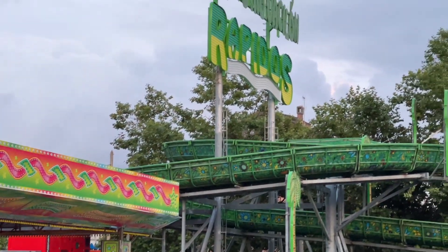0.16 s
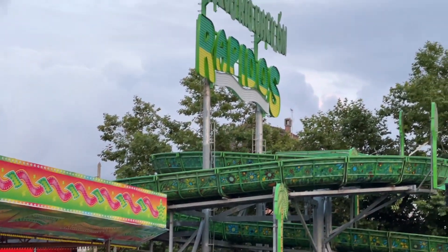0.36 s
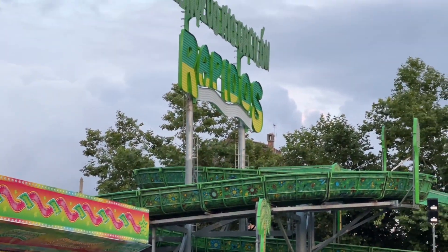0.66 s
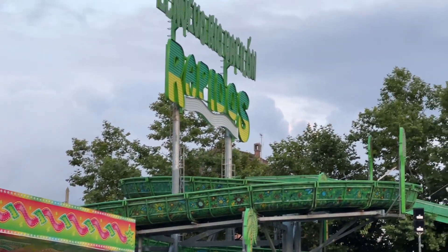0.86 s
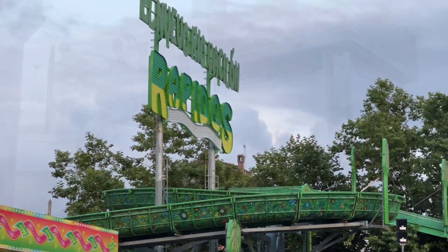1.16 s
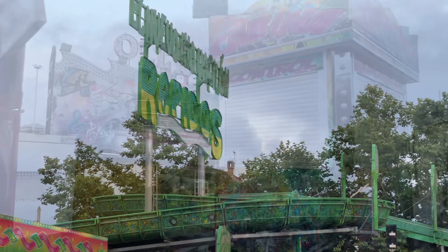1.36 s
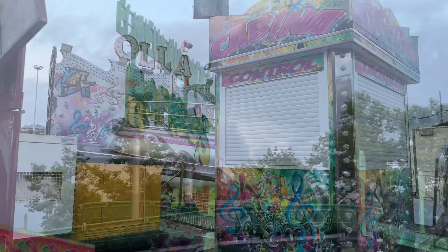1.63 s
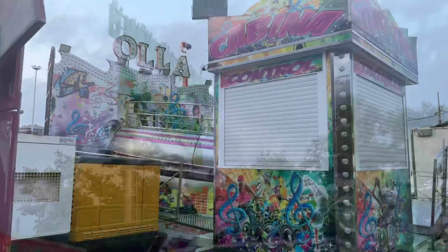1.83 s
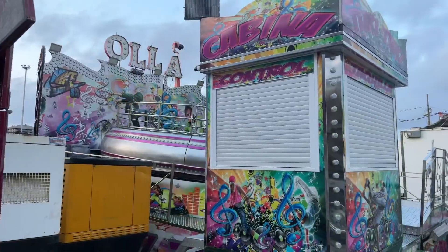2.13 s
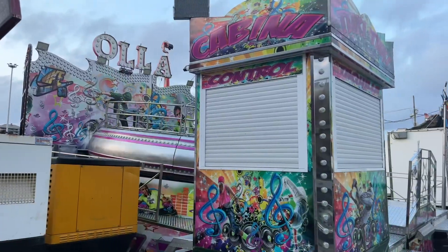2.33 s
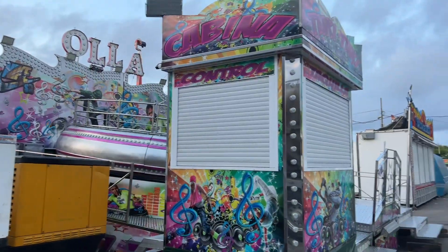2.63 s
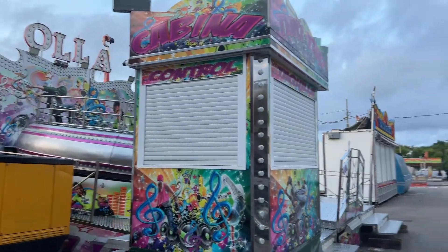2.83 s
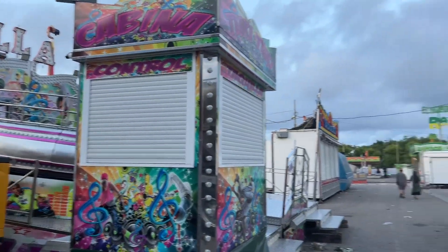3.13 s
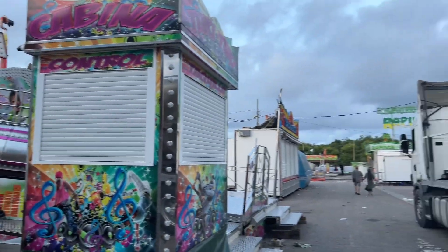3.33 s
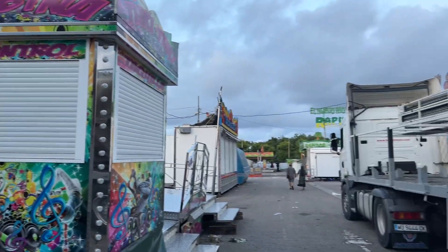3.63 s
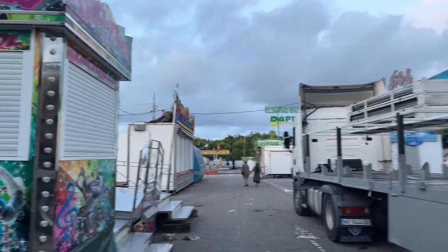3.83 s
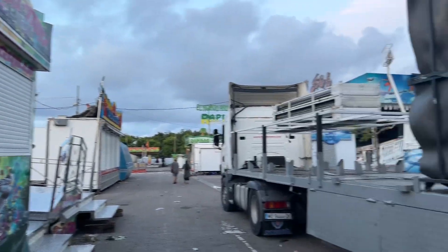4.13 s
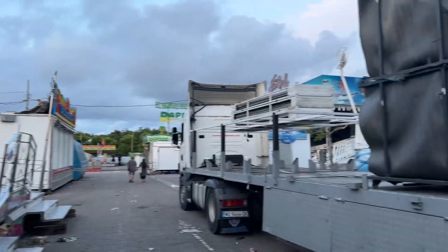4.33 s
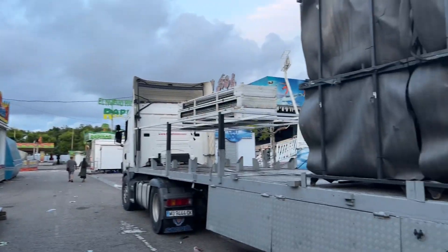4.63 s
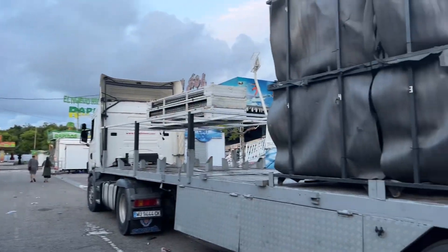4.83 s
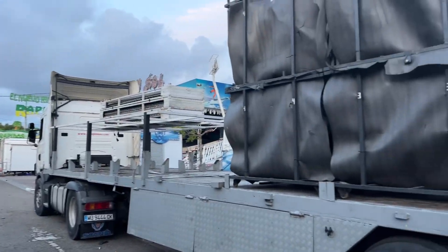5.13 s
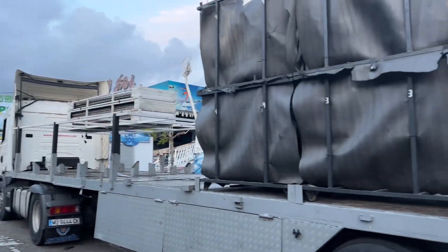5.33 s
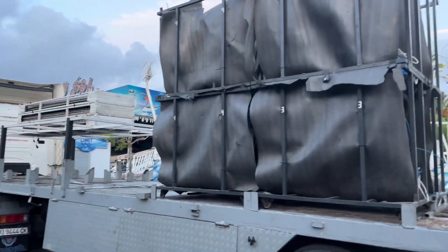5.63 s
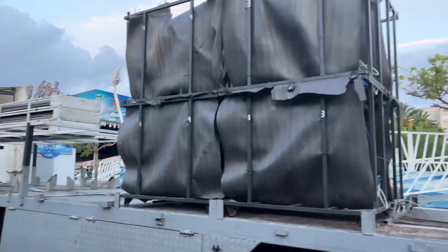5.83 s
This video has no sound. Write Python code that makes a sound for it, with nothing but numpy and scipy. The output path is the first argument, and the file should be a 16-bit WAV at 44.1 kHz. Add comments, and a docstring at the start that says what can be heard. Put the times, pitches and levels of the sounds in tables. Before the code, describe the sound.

For the first second, engines drone faintly across an empty fairground over a dull wash of outdoor noise. One soft swish of air swells at about 0.3 seconds and dies away. Between 1.1 and 2.2 seconds, this background gives way to a much louder diesel generator a few steps from the microphone. It holds a steady speed, with a fast, low exhaust throb, a roaring cooling fan, hissing air and a knocking casing that now and then clatters harder. A thin, shrill whistle wavers on top, and fainter high whistles come and go. From about 2.9 to 4.6 seconds the machine shifts from right to left as the listener turns, the fan loudest near 4.5 seconds. A bright rattle gradually grows, panels hum briefly, and the whistle swells after 5 seconds. Stalls and trailers reflect the sound, which continues to the end at about 6 seconds.

```python
"""A far drone and one soft swish carry across an empty fairground; then a diesel generator fades in close.
At the microphone its firings thump through the silencer, the casing knocks and the cooling fan roars,
with a thin unsteady whistle on top. Hard stalls and trailers throw the sound back from all around.
The listener turns, so the machine swings from right to left."""
import sys
import numpy as np
from scipy import signal
from scipy.fft import rfft, irfft
from scipy.io import wavfile
from scipy.ndimage import map_coordinates

SR = 44100
rng = np.random.default_rng(int(sys.argv[2]) if len(sys.argv) > 2 else 0)


def inscribe(sig):
    """Save sig as 16-bit PCM at rate SR to the path in sys.argv[1].

    A 1-D sig is mono; a 2-D sig holds one channel per row.
    Samples are clipped to [-1, 1] before scaling.
    """
    pcm = np.round(np.clip(np.atleast_2d(sig).T, -1, 1) * 32767)
    wavfile.write(sys.argv[1], SR, pcm.astype(np.int16))


N = 263718
T = np.arange(N) / SR
HZ = np.maximum(np.arange(N // 2 + 1) * SR / N, 1)

# exhaust at the silencer, close up: (frequency [Hz], relative level [dB])
SILENCER_SPECTRUM = [(20, -40), (39, -33), (52, -9), (78, 0), (117, 2.5), (156, 0.2), (195, -7.5),
                     (240, -19), (350, -25), (600, -28.5), (2000, -64), (8000, -130)]
# the three firings of an engine cycle: (relative level [dB])
FIRING_LEVELS = [2, 1, 0.5]
# moments when the thump sags or lifts slightly: (time [s], half-width [s], gain [dB])
THUMP_DIPS = [(1.835, .06, -3), (2.052, 0.024, -12), (3.2, 0.042, -3), (3.626, 0.055, -5.5),
              (3.9, 0.034, 0.5), (4.33, 0.032, -2), (5.42, .03, -8)]
# low tones out of step with the firings, making the chug uneven: (frequency [Hz], level [dB])
CHUG_TONES = [(33.5, -53), (67.8, -48.5), (112.6, -44.5)]
# modes of the casing: (frequency [Hz], relative level [dB])
CASING_MODES = [(735, -4.5), (785, 0.5), (850, 2), (940, -1.5), (1000, -2.5), (1125, -3.5), (1230, -7)]
# the casing clatters harder: (time [s], half-width [s], gain [dB])
CASING_CLATTERS = [(1.45, .02, 6), (1.69, .03, 3), (2.23, .04, 7), (2.86, .03, 3), (3.54, .05, 4),
                   (3.78, .04, 5), (4.33, .05, 5), (4.8, .035, 7), (5.32, .04, 3)]
# low rumble around the machine: (frequency [Hz], relative level [dB])
RUMBLE_SPECTRUM = [(20, -36), (32, -8), (40, -8), (52, 0), (66, 0.5), (100, -6.5), (135, -0.5), (170, 0),
                   (205, -8.5), (280, -33), (500, -56)]
# roar of the cooling fan: (frequency [Hz], relative level [dB])
FAN_SPECTRUM = [(120, -11), (220, -4), (290, 0.5), (355, 1), (425, -1.5), (470, -1.5), (660, -4.5),
                (830, -5), (1150, -3), (1400, -7), (1800, -6.5), (2050, -14.5), (4000, -38.5)]
# bright rattle of the casing: (frequency [Hz], relative level [dB])
RATTLE_SPECTRUM = [(900, 4), (1500, -3), (1800, 0), (2100, 4), (2500, 7), (2720, 0), (2850, 0),
                   (3500, -1.5), (4300, -5.5), (5500, -43)]
# hiss of the air outlet: (frequency [Hz], relative level [dB])
OUTLET_SPECTRUM = [(3500, -1.5), (5000, 5.5), (6000, 6), (6800, 6), (7400, 4.5), (9000, 0), (12000, -3.5),
                   (15500, -10.5)]
# narrow tones of fan, belt and casing: (frequency [Hz], half-width [Hz], level [dB])
MACHINE_TONES = [(233.7, 1.9, -52.5), (332.7, 1.7, -50.5), (367, 18, -48.5), (421, 19, -46.5),
                 (777, 18, -49.5), (850, 15, -50), (1129, 17, -50.5), (1620, 20, -59), (2380, 30, -64),
                 (2690, 17, -55.5)]
# short thin whistles: (time [s], half-width [s], frequency [Hz], waver [Hz], level [dB])
SHORT_WHISTLES = [(1.8, .28, 6880, 12, -49), (2.0, .5, 2680, 12, -54), (1.97, .07, 4587, 8, -47),
                  (2.3, .15, 4587, 8, -50), (2.68, .13, 4587, 8, -48), (2.65, .15, 6800, 20, -54),
                  (4.05, .15, 4610, 10, -51), (4.35, .04, 6860, 30, -51), (4.8, .25, 6885, 22, -49.5),
                  (5.6, .14, 7392, 12, -55), (4.8, .07, 2370, 20, -48), (5.25, .06, 2450, 20, -48),
                  (5.7, .6, 2685, 18, -49.5), (5.75, .12, 4570, 30, -47)]
# panels humming up: (time [s], half-width [s], frequency [Hz], level [dB])
PANEL_NOTES = [(3.71, .06, 366, -40), (4.39, .06, 358, -39), (5.12, .05, 300, -40), (5.2, .04, 585, -38),
               (5.31, .04, 598, -41), (5.38, .04, 362, -36), (5.6, .04, 376, -39), (5.92, .08, 502, -38)]
# the main whistle swells and sinks, more so on the left: (time [s], half-width [s], gain [dB])
WHISTLE_GAINS = [(1.7, 0.22, 1.5), (2.12, .04, 2.5), (2.618, 0.044, 5), (2.97, .1, -0.5), (4.12, 0.043, 1),
                 (4.357, .07, 2), (4.7, 0.36, -2.5), (5.362, 0.23, 3.5), (5.807, 0.11, 3), (5.97, .025, 2)]
# the main whistle bends upward: (time [s], half-width [s], rise [Hz])
WHISTLE_RISES = [(1.87, .04, 85), (2.11, .045, 85), (2.61, .035, 60), (2.86, .05, 75), (3.09, .04, 65),
                 (3.62, .25, 45), (4.26, .04, 45), (4.54, .09, 55), (4.77, .05, 40), (5.0, .045, 115),
                 (5.24, .04, 45), (5.58, .11, 30), (5.98, .045, 155)]
# dull wash from across the grounds: (frequency [Hz], relative level [dB])
WASH_SPECTRUM = [(25, -26), (38, -6), (52, -6), (65, -2), (90, -10.5), (125, -6), (180, -10), (310, -12.5),
                 (540, -18), (640, -25), (1140, -23.5), (1560, -29.5), (2100, -29), (8100, -46),
                 (12000, -70)]
# exhaust at a distance: (frequency [Hz], relative level [dB])
DRONE_SPECTRUM = [(20, -34), (39, -14), (78, 1), (117, -32), (156, 2), (195, -4.5), (240, -15.5),
                  (600, -29.5), (2000, -67), (8000, -130)]
# other machines droning far off: (frequency [Hz], half-width [Hz], level [dB])
DISTANT_TONES = [(56.2, 2.9, -46), (92.4, 14, -46.5), (299, 15, -58), (557, 8.6, -64.5)]
# the far hum swells: (time [s], half-width [s], frequency [Hz], level [dB])
DISTANT_SWELLS = [(.1, .1, 99, -41), (.13, .14, 121, -46), (.16, .18, 548, -59), (.42, .06, 88, -42),
                  (1.08, .06, 84, -43)]
# soft rush of air: (frequency [Hz], relative level [dB])
SWISH_SPECTRUM = [(300, -11), (700, -0.5), (1200, 1), (1600, -4), (2200, -1), (3200, -6), (4500, -11),
                  (7000, -14.5), (9000, -20), (11000, -77)]
# early echoes off ground and stalls: (delay [ms], level [dB])
EARLY_ECHOES = [(7.3, -32.5), (11.2, -27), (17.5, -13)]
# likeness of left and right in the sound off the stalls: (frequency [Hz], correlation [-1 to 1])
STALL_CORRELATION = [(60, 0.89), (170, 0.82), (400, 0.92), (660, -0.61), (850, 0.85), (1150, -0.17),
                     (1600, -0.67), (2300, -0.046), (4000, 0.0088), (15000, -0.18)]
# shading of the two ears: (frequency [Hz], left minus right [dB])
EAR_SHADING = [(130, -2.5), (300, -4.5), (520, 1), (720, -2), (1030, 2.5), (1600, 0.5), (2450, -2.5),
               (4000, 0.5), (6300, 6.5), (8300, -2), (11000, 0)]

FIRING_HZ, FIRST_FIRING_S = 39.03, .0028
TURN_S, TURN_LENGTH_S = 2.88, 1.68  # the listener turns at an even pace
FIRST_LAG_MS, LAST_LAG_MS = 0.25, -0.458  # left ear behind right


def generator(firings):
    """The machine from a few steps away; `firings` is the running count of its firings."""
    thump = aimed(exhaust(firings, SILENCER_SPECTRUM, scatter_db=1.0))
    thump *= undb(-29.5 + swells(THUMP_DIPS))
    casing = casing_shake(firings) + casing_knocks(firings)
    rumble = diffuse(undb(curve(RUMBLE_SPECTRUM)), curve(STALL_CORRELATION)) * undb(-36)
    rush = fan_roar(firings) + casing_rattle(firings) + outlet_hiss()
    machine = thump + casing + rumble + rush + steady_tones() + brief_tones()
    return irfft(rfft(machine) * pan(curve(EAR_SHADING)), N) + whistle(firings)


def exhaust(firings, spectrum, scatter_db, chamber_hz=135, chamber_width_hz=50):
    """One pulse a firing, each cylinder a little different, rings the silencer."""
    onsets = firing_samples(firings)
    scatter = scatter_db * rng.standard_normal(len(onsets))
    pulses = np.zeros(N)
    pulses[onsets] = undb(np.resize(FIRING_LEVELS, len(onsets)) + scatter)
    # the chamber lets its own note out late
    chamber = np.exp(-2j * np.arctan((HZ - chamber_hz) / chamber_width_hz))
    return unit(irfft(rfft(ring(pulses, spectrum)) * chamber, N))


def casing_shake(firings):
    """The casing shakes twice a crank turn: a low hum, with other tones beating against it."""
    crank_turns = firings * 2 / len(FIRING_LEVELS)
    hum = unit(np.sin(4 * np.pi * crank_turns) * undb(2 * wander(1.3))) * undb(-47)
    return aimed(hum + sum(undb(db) * tone(hz, waver_hz=3.64) for hz, db in CHUG_TONES))


def casing_knocks(firings, attack_s=.002, t60_s=.085, slack_s=.018, scatter_db=3.5):
    """Every firing knocks the loose panels, each a little late and with its own strength."""
    onsets = firing_samples(firings)
    age = T[:SR // 4]
    envelope = (1 - np.exp(-(age / attack_s) ** 2)) * undb(-60 * age / t60_s)
    knocks = 0
    for hz, db in CASING_MODES:
        slack = (slack_s * SR * rng.random(len(onsets))).astype(int)
        strength = undb(db + scatter_db * rng.standard_normal((len(onsets), 1)))
        blows = np.zeros((2, N))
        blows[:, np.minimum(onsets + slack, N - 1)] = (strength * rng.standard_normal((len(onsets), 2))).T
        mode = envelope * np.sin(2 * np.pi * hz * age)
        knocks += signal.fftconvolve(blows, [mode], axes=1)[:, :N]
    return unit(knocks) * undb(-41.5 + swells(CASING_CLATTERS))


def fan_roar(firings, blade_hz=146):
    """The fan blades chop the air; the roar is loudest as the listener's turn ends."""
    blades = np.cos(2 * np.pi * np.cumsum(blade_hz + 2 * wander(5.6)) / SR)
    roar = among_stalls(undb(curve(FAN_SPECTRUM)), direct_db=-7.5)
    flutter_db = 0.5 * np.cos(4 * np.pi * firings) + 0.53 * blades + 1.57 * wander(22)
    return roar * undb(-34 + 2.5 * swell(4.53, 0.3) + flutter_db)


def casing_rattle(firings):
    """A bright rattle pulses with the firings and grows as the casing comes into the open."""
    rattle = among_stalls(undb(curve(RATTLE_SPECTRUM)), direct_db=-22)
    flutter_db = 0.23 * np.cos(2 * np.pi * firings) + 1.35 * wander(19)
    return rattle * undb(-44 + opening(db_per_s=2.5) + flutter_db)


def outlet_hiss():
    """Air hisses from the outlet as it comes into the open, sinking a little in mid-turn."""
    hiss = among_stalls(undb(curve(OUTLET_SPECTRUM)), direct_db=-8.5)
    return hiss * undb(-40.5 + opening(db_per_s=0.56) - swell(3.9, 1) + 0.78 * wander(26))


def steady_tones():
    """Fan, belt and casing sing in narrow bands of noise."""
    power = sum((undb(db) * unit(resonance(hz, width))) ** 2 for hz, width, db in MACHINE_TONES)
    return np.sqrt(np.mean(power)) * among_stalls(np.sqrt(power), direct_db=0.62)


def brief_tones():
    """Thin whistles and panel hums come and go, straight from the machine."""
    whistles = sum(undb(db) * swell(s, width) * tone(hz, waver)
                   for s, width, hz, waver, db in SHORT_WHISTLES)
    return aimed(whistles + hums(PANEL_NOTES, waver_hz=4.25))


def whistle(firings, pitch_hz=4724, steady_hz=4702, drift_hz=14, flutter_hz=27, ripple_hz=46):
    """A shrill wandering whistle beats with its echoes, beside a steadier one and a scattered skirt."""
    hz = pitch_hz + swells(WHISTLE_RISES) + drift_hz * wander(12) + flutter_hz * wander(96.8)
    hz += ripple_hz * np.cos(2 * np.pi * firings)
    core = unit(np.sin(2 * np.pi * np.cumsum(hz) / SR) * undb(2.2 * wander(76)))
    # one echo reaches each ear
    echoes = np.array([np.roll(core, int(ms * SR / 1000)) for ms, _ in EARLY_ECHOES[:2]])
    skirt = among_stalls(resonance(pitch_hz, 213) ** 2, direct_db=-18)
    steady = np.array([tone(steady_hz, waver_hz=8.63) for ear in range(2)])
    voices = unit(aimed(core) + undb(-4) * echoes + undb(-1.5) * skirt + undb(-5) * steady)
    swell_db = swells(WHISTLE_GAINS)
    return voices * undb(-39 + swell_db) * pan(2 + swell_db)


def fairground(firings):
    """Engines drone far across the grounds over a dull wash, and one swish passes."""
    wash = diffuse(undb(curve(WASH_SPECTRUM)), 0.73) * undb(-44 + 0.39 * wander(9.2))
    drone = exhaust(firings, DRONE_SPECTRUM, scatter_db=3.5) * undb(-46)
    machines = sum(undb(db) * noise(resonance(hz, width)) for hz, width, db in DISTANT_TONES)
    return (wash + drone + machines + hums(DISTANT_SWELLS, waver_hz=2.9) + swish()) * pan(-0.8)


def swish(peak_s=0.29, rise_db_per_s=33, fall_db_per_s=49):
    """A soft rush of air starts abruptly, swells and dies away."""
    db = -45.5 + np.minimum(rise_db_per_s * (T - peak_s), fall_db_per_s * (peak_s - T))
    return diffuse(undb(curve(SWISH_SPECTRUM)), 0.83) * ramp(0.084, 0.033) * undb(db)


def among_stalls(gain, direct_db):
    """Machine noise, combed by early echoes, arrives directly and thrown back from all around."""
    comb = abs(1 + sum(undb(db) * np.exp(-2j * np.pi * HZ * ms / 1000) for ms, db in EARLY_ECHOES))
    direct = undb(direct_db) * aimed(noise(gain * comb))
    return unit(direct + diffuse(gain * comb, curve(STALL_CORRELATION)))


def aimed(x):
    """Direct sound reaches the nearer ear first: the right before the turn, the left after."""
    lag_ms = FIRST_LAG_MS + (LAST_LAG_MS - FIRST_LAG_MS) * ramp(TURN_S, TURN_LENGTH_S)
    shift = lag_ms * SR / 1000 / 2
    return np.array([map_coordinates(x, [np.arange(N) - side * shift], order=3, mode="nearest")
                     for side in (1, -1)])


def diffuse(gain, correlation):
    """Noise from all around, alike in left and right to a given degree."""
    alike = np.clip(correlation, -.98, .98)
    weights = np.sqrt([1 + alike, 1 - alike]).reshape(2, -1)
    mid, side = rfft(rng.standard_normal((2, N))) * gain * weights
    return unit(irfft(np.array([mid + side, mid - side]), N))


def pan(db):
    """Gains of the two ears for a level difference, left minus right."""
    return undb(np.array([db, -db]).reshape(2, -1) / 2)


def opening(db_per_s):
    """A steady rise in dB from the start of the listener's turn."""
    return db_per_s * np.maximum(T - TURN_S, 0)


def firing_samples(firings):
    """Samples at which a cylinder fires."""
    return np.flatnonzero(np.diff(np.floor(firings)))


def ring(x, spectrum):
    """Causal filter with a given spectrum, from the cepstrum of its log gain."""
    cepstrum = irfft(np.log(undb(curve(spectrum))), N)
    cepstrum[1:N // 2] *= 2
    cepstrum[N // 2 + 1:] = 0
    return irfft(rfft(x) * np.exp(rfft(cepstrum)), N)


def hums(notes, waver_hz):
    """Wavering tones that each swell and fade once."""
    return sum(undb(db) * swell(s, width) * tone(hz, waver_hz) for s, width, hz, db in notes)


def tone(hz, waver_hz):
    """A clean tone of rms 1 whose pitch wavers."""
    return unit(np.sin(2 * np.pi * np.cumsum(hz + waver_hz * wander(28.9)) / SR))


def noise(gain):
    """Noise of rms 1 with a given gain at each frequency."""
    return unit(irfft(rfft(rng.standard_normal(N)) * gain, N))


def wander(rate_hz):
    """Random drift of rms 1, mostly slower than the given rate."""
    return noise(1 / (1 + (HZ / rate_hz) ** 4))


def resonance(hz, half_width_hz):
    """Gain of a resonance with steep skirts."""
    return 1 / (1 + ((HZ - hz) / half_width_hz) ** 2)


def curve(points):
    """Points joined on a log-frequency axis."""
    hz, value = np.transpose(points)
    return np.interp(np.log(HZ), np.log(hz), value)


def ramp(start_s, length_s):
    """An even rise from 0 to 1."""
    return np.clip((T - start_s) / length_s, 0, 1)


def swell(time_s, half_width_s):
    """A smooth rise to 1 and fall around a moment."""
    return np.exp(-((T - time_s) / half_width_s) ** 2)


def swells(moments):
    """A sum of swells, each with its own height."""
    return sum(height * swell(s, width) for s, width, height in moments)


def undb(db):
    """Decibels to gain."""
    return 10 ** (np.asarray(db) / 20)


def unit(x):
    """Scale to rms 1."""
    return x / np.sqrt(np.mean(x ** 2))


def scene():
    """The far drone gives way to the close machine, whose governor holds its speed."""
    firings = FIRING_HZ * (T - FIRST_FIRING_S) + 0.011 * wander(4.1)
    near = ramp(start_s=1.124, length_s=1.06)
    return near * generator(firings) + (1 - near) * fairground(firings)


def record(dry):
    """The microphone drops the deepest bass and the very top."""
    low_cut = signal.butter(8, 28, "highpass", fs=SR, output="sos")
    high_cut = signal.ellip(10, .2, 80, 15800, fs=SR, output="sos")
    return signal.sosfilt(high_cut, signal.sosfilt(low_cut, dry * ramp(0, .004)))


dry = scene()
out = record(dry)
inscribe(out)
```